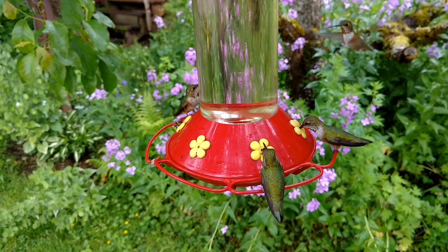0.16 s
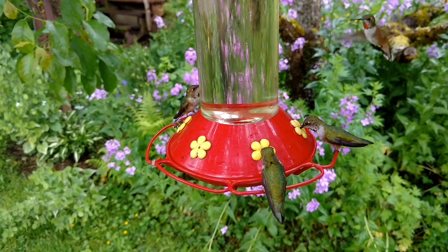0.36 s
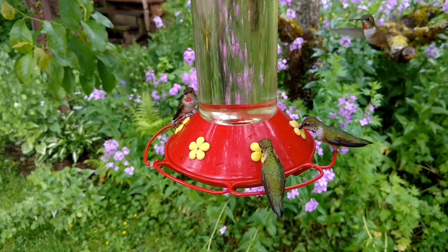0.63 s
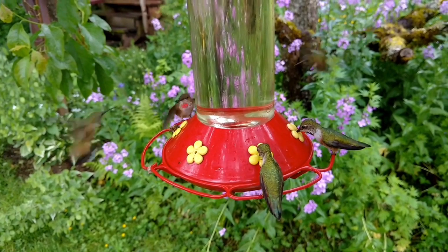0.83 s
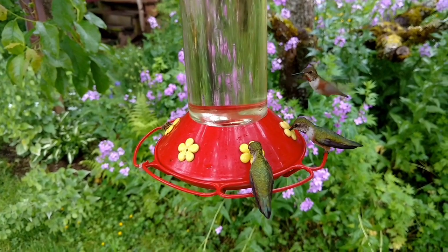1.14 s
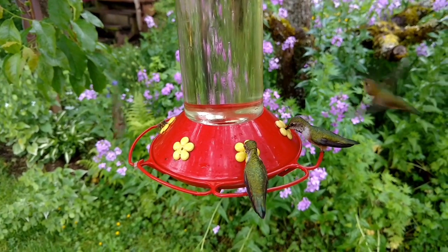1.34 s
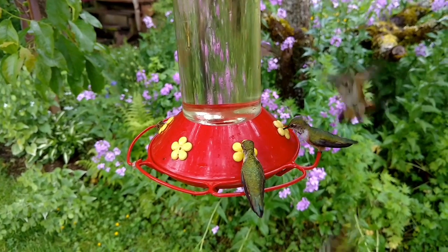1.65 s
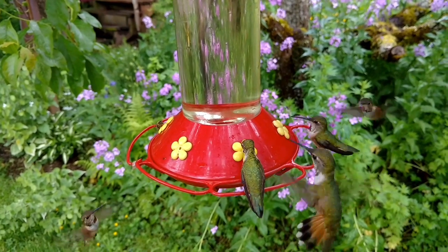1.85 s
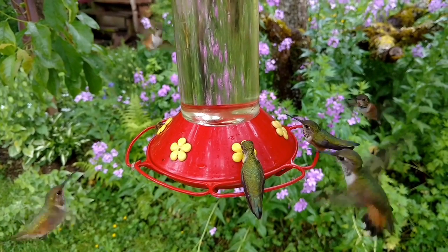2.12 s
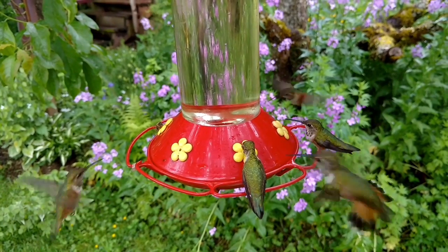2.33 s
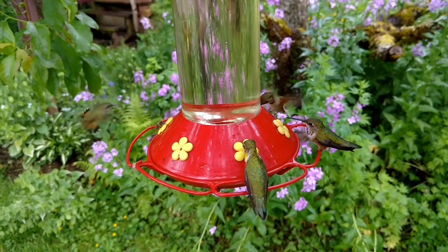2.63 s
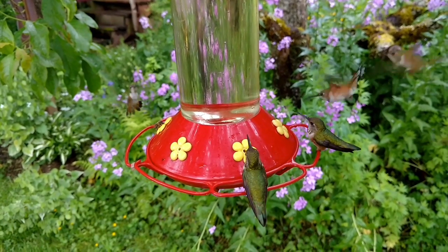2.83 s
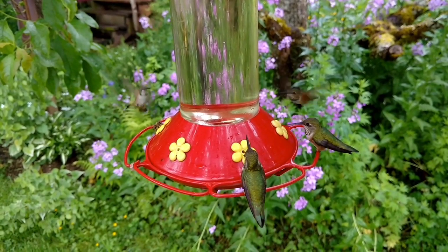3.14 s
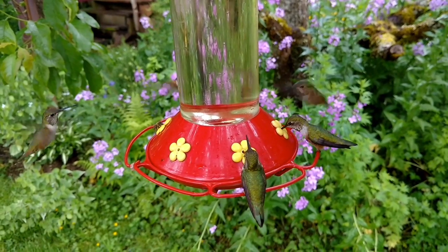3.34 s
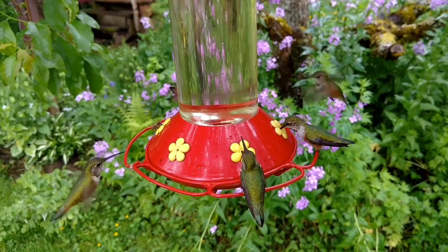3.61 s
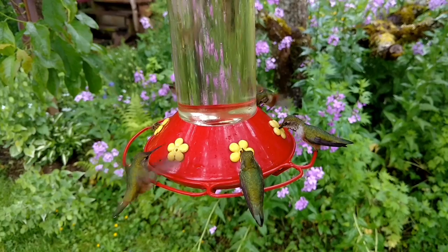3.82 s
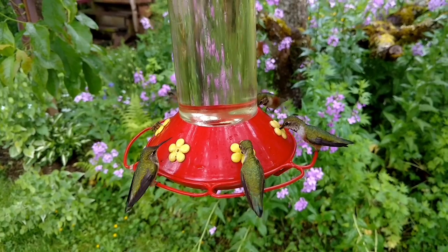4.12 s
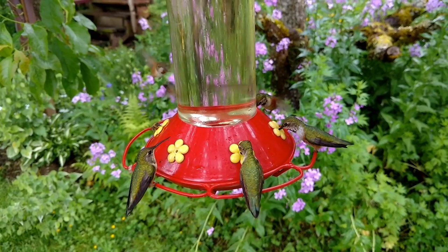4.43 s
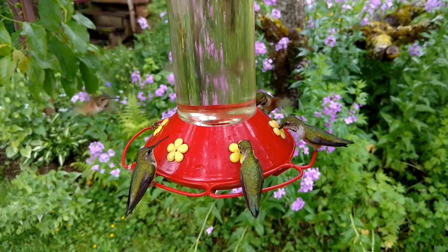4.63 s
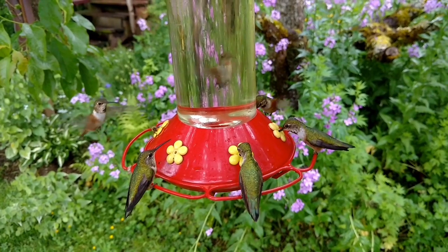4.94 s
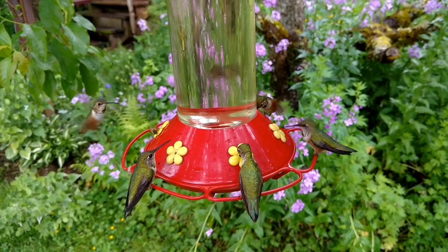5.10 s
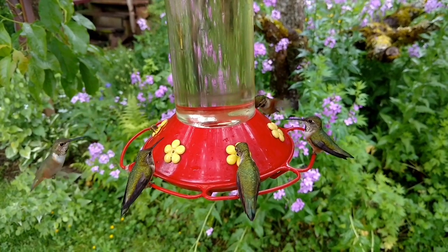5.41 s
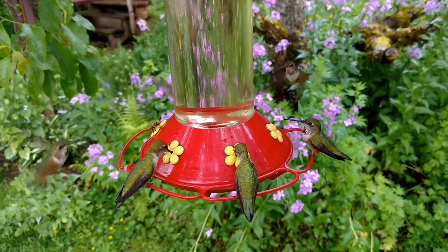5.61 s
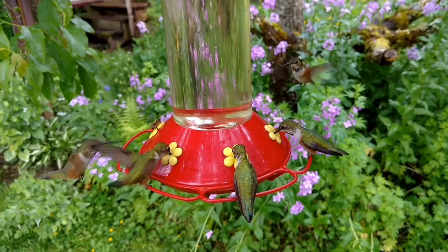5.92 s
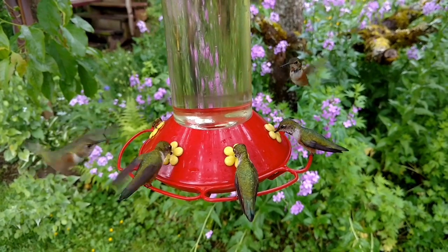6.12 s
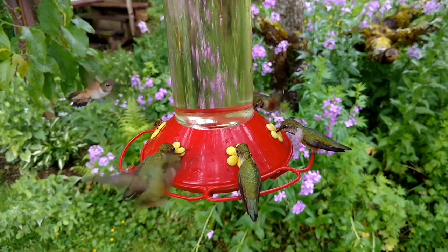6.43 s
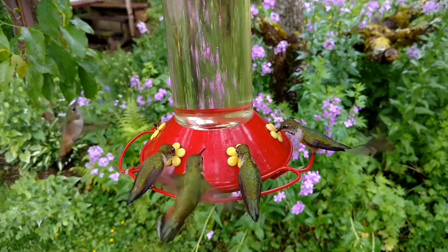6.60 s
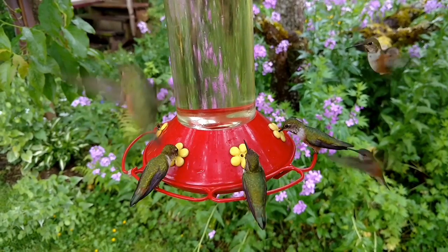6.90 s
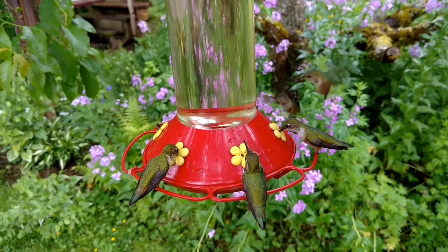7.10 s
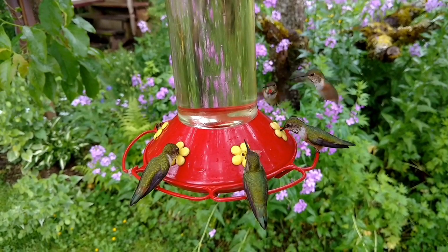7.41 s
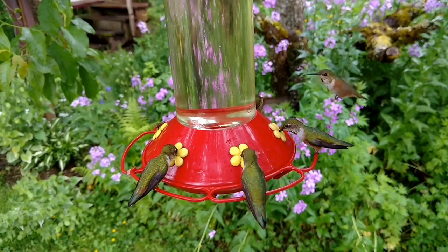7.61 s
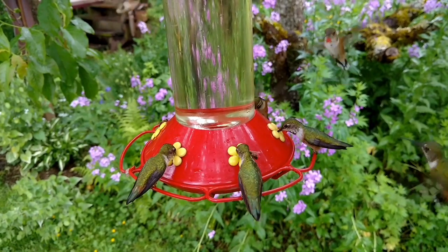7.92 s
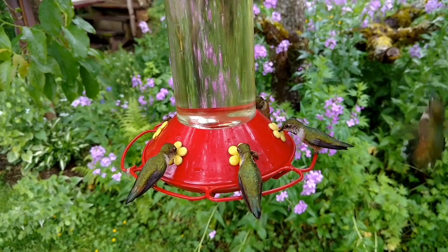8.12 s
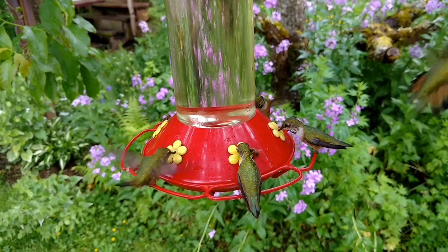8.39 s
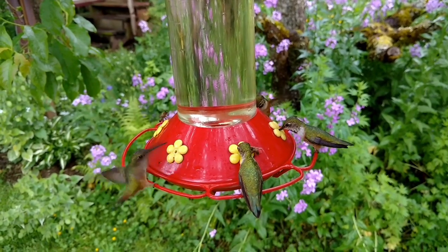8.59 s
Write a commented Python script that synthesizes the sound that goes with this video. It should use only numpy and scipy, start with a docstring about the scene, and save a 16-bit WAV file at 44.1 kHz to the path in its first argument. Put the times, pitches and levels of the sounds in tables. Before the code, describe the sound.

Hummingbirds hover and dart around a feeder with low fluttering wing hum, sharp high chips, squeals and buzzes, then a rapid squeaky chase.

```python
"""Several hummingbirds hover and squabble round a nectar feeder, close to a phone in a quiet garden.
All through, each wing stroke is a soft pressure pulse with a swish of feathers, and birds dart up close.
Whistling voices chip, growl, squeal and buzz among far songbirds, rasps of noise, snaps and one knock.
From about seven seconds a chase begins: a wobbling trill, then falling chirps with more squeals and buzzes.
The phone's two ports spread the treble wide."""
import sys
import numpy as np
from scipy import signal
from scipy.fft import rfft, irfft
from scipy.io import wavfile
from scipy.ndimage import uniform_filter1d

SR = 44100
rng = np.random.default_rng(int(sys.argv[2]) if len(sys.argv) > 2 else 0)


def to_wav(sig):
    """Store sig (one row per channel, or 1-D mono) as 16-bit WAV at the path in sys.argv[1].

    Samples outside -1..1 are clipped; the rate is SR.
    """
    pcm = np.clip(np.atleast_2d(sig), -1, 1) * 32767
    pcm = np.round(pcm).astype(np.int16)
    wavfile.write(sys.argv[1], SR, pcm.T)  # frames by channels


N = 385875


def undb(db):
    """Decibels to gain."""
    return 10 ** (np.asarray(db) / 20)


def unit(x):
    """Scale to an rms of 1."""
    return x / np.sqrt(np.mean(x ** 2))


def spectrum_at(points, hz):
    """Read (Hz, dB) points on a log-frequency axis."""
    f, db = np.transpose(points)
    return np.interp(np.log(np.maximum(hz, 1)), np.log(f), db)


def colour(x, points):
    """Causal filter with the given spectrum, built from its cepstrum."""
    size = 2 * N
    cepstrum = irfft(np.log(undb(spectrum_at(points, np.fft.rfftfreq(size, 1 / SR)))))
    cepstrum[1:N] *= 2
    cepstrum[N + 1:] = 0
    return irfft(rfft(x, size) * np.exp(rfft(cepstrum)))[..., :N]


def walk(rate, size=N):
    """Smooth random drift with a spread near 1."""
    k = max(int(SR / rate), 1)
    steps = np.repeat(rng.standard_normal(size // k + 2), k)
    return unit(uniform_filter1d(uniform_filter1d(steps, k), k))[:size]


def clock(length):
    """Sample times of a short sound."""
    return np.arange(int(length * SR)) / SR


def fade(t, rise, fall):
    """Smooth opening and closing of a short sound."""
    return np.sin(np.pi / 2 * np.clip(np.minimum(t / rise, (t[-1] - t) / fall), 0, 1)) ** 2


def add(track, start, sound):
    """Mix a short sound into a track."""
    i = max(int(start * SR), 0)
    track[i:i + len(sound)] += sound[:N - i]


def play(table, source):
    """One sound for each row of a table, at the row's time."""
    track = np.zeros(N)
    for start, *row in table:
        add(track, start, source(*row))
    return track


def place(x, pan_db):
    """Share a sound between left and right."""
    return x * undb(pan_db * np.array([[.5], [-.5]]))


def wings(beat_hz, upstroke, jitter, scatter_db, swish_width):
    """One bird: a pressure pulse on each down- and upstroke, and a swish that follows the strokes."""
    turns = rng.random() + np.cumsum(beat_hz * (1 + jitter * walk(30))) / SR
    # steering shifts the timing (in wingbeats) and the force of the upstroke
    lag = .47 + .03 * walk(14)
    steer = undb(2.5 * walk(9))
    pulses, gate = np.zeros(N), np.zeros(N)
    for offset, strength in ((0, 1), (lag, upstroke * steer)):
        phase = (turns - offset) % 1 - .5
        force = strength * undb(scatter_db * walk(40))
        pulses -= force * np.exp(-(phase / 0.01) ** 2)
        gate += force * np.exp(-(phase / swish_width) ** 2)
    swish = unit(gate + 0.67) * rng.standard_normal(N)
    return unit(pulses - pulses.mean()), swish


def darting():
    """Each dart is a straight pass, loudest where it is closest; the loudest mostly sets beat and side."""
    # A bird darts up close and away again.
    # Each row: time when closest in seconds, half-width in seconds, relative hum level in dB,
    # relative feather swish level in dB, wingbeat when closest in Hz, left minus right in dB.
    dart_rows = [ (.03, 0.069, -42, -39.5, 52.9, 6), (.71, 0.042, -38.5, -50.5, 63.06, 0),
                 (.89, 0.13, -39, -46, 53.8, 2), (1.481, 0.1, -36.5, -42.5, 58.2, -4),
                 (1.67, 0.057, -41, -50, 53.3, 5), (1.85, 0.054, -37.5, -41, 58.44, 1),
                 (2.14, 0.047, -40, -41, 50.04, -2), (2.257, 0.052, -35, -40, 58.33, 1),
                 (2.38, 0.047, -39, -43, 60.26, 0), (2.75, 0.087, -46, -52, 57.84, -5),
                 (3.07, 0.13, -41, -42.5, 59.7, 3), (3.255, .02, -33, -41, 65.46, 2),
                 (3.431, 0.063, -42, -43.5, 62.1, 3), (3.549, 0.055, -36.5, -45.5, 73.2, -1),
                 (3.73, 0.044, -44, -51, 63.1, -2), (4.33, 0.076, -46, -50, 62.5, 2),
                 (4.51, 0.037, -44, -47, 67.4, 6), (5.07, 0.066, -45, -50.5, 53.26, 3),
                 (5.39, 0.032, -44.5, -45.5, 57.57, 0), (5.48, 0.032, -41.5, -50, 58, 0),
                 (5.679, 0.038, -38.5, -44.5, 61.2, 1), (5.81, 0.042, -43, -45, 54.97, -1),
                 (5.958, 0.041, -40, -51, 65.54, 0), (6.19, 0.064, -39, -47, 58.97, 1),
                 (6.36, 0.05, -39.5, -53, 58.7, 1), (6.49, 0.053, -37.5, -45, 58, -4),
                 (6.58, 0.02003, -32, -41.5, 67, -3), (6.655, .05, -33, -45, 62.67, 3),
                 (6.735, 0.049, -35.5, -41.5, 61.95, 3), (6.9, 0.1, -43, -61, 55.8, 3),
                 (7.46, 0.075, -53, -71, 56.63, 7), (7.63, 0.034, -43, -49, 54.9, -2),
                 (7.74, 0.063, -45, -64, 55.46, -7), (7.931, 0.057, -44, -53.5, 54.36, -5),
                 (8.29, 0.063, -51, -56, 48.07, -8), (8.66, 0.095, -44, -50.5, 61.8, 0)]
    s, width, hum_db, swish_db, beat_hz, pan_db = np.transpose(dart_rows)
    sag = .035  # beats faster on the way in than on the way out, by up to this share each way
    falloff = 2.6  # the wing sound weakens as this power of the distance
    t = np.linspace(0, N / SR, 4000)
    along = (t[:, None] - s) / width
    distance = np.hypot(1, along)
    beat_hz = beat_hz * (1 - sag * along / distance)
    hum, swish = (undb(db) * distance ** -falloff for db in (hum_db, swish_db))
    share = hum ** 4 / np.sum(hum ** 4, axis=1, keepdims=True)
    hum_level, swish_level = np.linalg.norm(hum, axis=1), np.linalg.norm(swish, axis=1)
    controls = hum_level, swish_level, np.sum(share * beat_hz, axis=1), share @ pan_db
    return [np.interp(np.arange(N) / SR, t, control) for control in controls]


def hovering():
    """Birds further back: hum level, swish level and side glide from row to row."""
    # Each row: time in seconds, relative hum level in dB, relative feather swish level in dB,
    # left minus right of the hum in dB.
    hover_rows = [(0, -46.5, -52, -1), (.33, -50.5, -47, 14), (.6, -47, -44, 8), (1.2, -48, -50, -1),
                  (1.6, -41.5, -39.5, 10), (2, -45, -47, -8), (2.45, -46, -45.5, -1),
                  (2.85, -47.5, -47.5, -9), (3.35, -45, -45, -1), (4.05, -50, -48.5, -1),
                  (4.75, -48.5, -45.5, 0), (5.25, -51, -50, 2.5), (6, -46, -46.5, 3), (6.65, -36.5, -36, 2),
                  (7.18, -62, -58, 1), (7.85, -51, -54, -7), (8.12, -58.5, -58.5, -14.5),
                  (8.75, -48.5, -50, -14)]
    s, *columns = np.transpose(hover_rows)
    hum_db, swish_db, pan_db = (np.interp(np.arange(N) / SR, s, column) for column in columns)
    return undb(hum_db), undb(swish_db), pan_db


def off_axis(hum):
    """Low hum is added with opposite signs to the two sides, which widens it."""
    side = signal.sosfilt(signal.butter(1, 90, fs=SR, output="sos"), hum)
    return (undb(2.5) * side - 0.082 * hum) * np.array([[1], [-1]])


def downwash(lead, crowd):
    """Air stirred by the wings buffets each port on its own, mostly in the bass."""
    near_db, crowd_db = -10, -3  # stirred air, relative to the hum controls
    air_colour = [(25, -33), (42, -32), (60, -16), (82, -17.5), (112, -2.5), (230, -1.5),
                  (400, -10), (800, -21.0), (3000, -62)]  # (Hz, dB)
    eddies = colour(rng.standard_normal((2, N)), air_colour)
    return unit(eddies) * np.hypot(undb(near_db) * lead, undb(crowd_db) * crowd)


def flock():
    """One near wing darts about and two beat behind it at changing rates; gives stereo hum, mono swish."""
    # The sound of one wing stroke. Each row: frequency in Hz, level in dB.
    stroke_colour = [(30, -60), (50, -25), (62, -8.5), (82, -5.5), (108, 0), (170, 6), (235, 3),
                     (330, -3.5), (530, -0.5), (700, -19), (1200, -17.5), (3000, -39.5)]
    # Air through the feathers. Each row: frequency in Hz, level in dB.
    feather_colour = [(100, -15.5), (400, 6.5), (900, -0.5), (1800, -1), (3200, 2.5), (4000, 4), (5200, 3),
                      (7000, -2.5), (8500, -8), (10000, -16.5), (14500, -11.5), (16000, -40)]
    lead, lead_swish, lead_hz, lead_pan_db = darting()
    crowd, crowd_swish, crowd_pan_db = hovering()

    near, swish = wings(lead_hz, upstroke=.28, jitter=.014, scatter_db=2, swish_width=.11)
    near = lead * unit(colour(near, stroke_colour))
    swish = lead_swish * swish

    behind = 0
    for beat_hz in (54, 61):
        changing_hz = beat_hz * (1 + .04 * walk(3))
        pulses, air = wings(changing_hz, upstroke=.38, jitter=.014, scatter_db=2, swish_width=.13)
        share = undb(4.0 * walk(3.903))  # each bird's level wavers
        behind = behind + share * pulses
        swish = swish + crowd_swish * unit(share) * air / np.sqrt(2)
    behind = crowd * unit(colour(behind, stroke_colour))

    hum = place(near, lead_pan_db) + place(behind, crowd_pan_db) + off_axis(near + behind)
    swish = unit(colour(swish, feather_colour)) * np.std(swish) * undb(3.5)
    return undb(-0.56) * hum + downwash(lead, crowd), swish


def garden_air():
    """Quiet background noise, shaped by a spectrum, with a slowly drifting level."""
    # Each row: frequency in Hz, level in dB.
    garden_colour = [(20, -12), (70, 14), (130, 21), (500, 16), (900, 1.5), (2000, 9.5), (3500, -8),
                     (6000, -48.5), (10000, 6.5), (16000, 9)]
    return unit(colour(rng.standard_normal(N), garden_colour)) * undb(-60.0 + walk(1.83))


def syrinx(hz, overtone_db, rough):
    """A whistle with overtones shaped by the throat; roughness shakes pitch and strength and adds hiss."""
    # How strongly throat and bill pass each partial. Each row: frequency in Hz, level in dB.
    throat = [(1800, -4), (2600, -3), (3400, -0.5), (5000, -1), (6500, 1.5), (9200, -4), (10200, -17),
              (11500, -10.5), (13000, -19.5), (16000, -30)]
    hiss_db = -7  # turbulent air in a fully rough voice
    hz = hz * (1 + 0.153 * rough * walk(2500, size=len(hz)))
    phase = 2 * np.pi * np.cumsum(hz) / SR
    tone = 0
    for k in range(1, 5):
        strength = undb(spectrum_at(throat, k * hz) + overtone_db * np.log2(k))
        tone = tone + strength * (k * hz < SR / 2) * np.sin(k * phase)
    band = signal.butter(2, [3500, 9000], "bandpass", fs=SR, output="sos")
    hiss = signal.sosfilt(band, rng.standard_normal(len(hz)))
    shake = undb(1.1 * rough * walk(900, size=len(hz)))
    return tone * shake + undb(hiss_db) * rough * unit(hiss)


def songbird(length, start_hz, end_hz, arch_hz, db, warble_hz):
    """A soft, curved glide of wavering strength; the deeper the warble, the hoarser it sounds."""
    t = clock(length)
    u = t / length
    warble = .5 * walk(160, size=len(t)) + 1.3 * walk(1100, size=len(t))
    hz = start_hz + (end_hz - start_hz) * u + arch_hz * np.sin(np.pi * u) + warble_hz * warble
    waver_db = 3.5 * walk(70, size=len(t)) - 1.5
    return undb(db + waver_db) * fade(t, 0.0088, 0.01) * np.sin(2 * np.pi * np.cumsum(hz) / SR)


def far_birds():
    """Far birds sing short gliding notes."""
    # Each row: start in seconds, length in seconds, start pitch in Hz, end pitch in Hz,
    # arch of the pitch in Hz, relative level in dB, warble depth (relative, in Hz).
    songbird_rows = [ (.09, 0.075, 3600, 3140, 0, -50, 70), (.19, .16, 7650, 7360, 200, -54, 120),
                     (.337, 0.061, 4120, 4105, 20, -37, 25), (.39, 0.13, 4150, 4090, 0, -52, 25),
                     (.84, .22, 4635, 4710, 61, -49, 35), (1.06, 0.224, 4360, 4334, -50.5, -50, 55),
                     (1.46, .17, 4190, 4190, 0, -47.5, 35), (1.68, .15, 4163, 3270, 0, -49, 99),
                     (1.96, .13, 4230, 4350, 0, -52.5, 50), (3.61, .24, 4650, 4650, 111, -54, 80),
                     (3.69, 0.052, 3420, 3220, -70, -52, 15.3), (3.86, .04, 3630, 3570, 7, -56, 15),
                     (3.995, 0.036, 4120, 4020, 0, -59, 15), (4.06, .06, 4000, 4080, 170, -52, 15),
                     (4.113, 0.056, 3940, 3300, -90, -51, 20)]
    return play(songbird_rows, songbird)


def chip(lead, lead_db, knee_hz, glide, db, overtone_db):
    """Any thin high lead-in sags to a knee; the note dives within milliseconds and stops short."""
    peak_glides, spread_glides, tail_db = 0.92, 1, -19  # pressure peak of the dive, and what stays under it
    t = clock(lead + 2.5 * glide)
    u = np.maximum(t - lead, 0) / glide
    dive_hz = (knee_hz - 1800) * np.exp(-(u / 1.06) ** 1.2)
    hz = 1800 + dive_hz + 1500 * np.tanh(np.maximum(lead - t, 0) / .004)
    dive = np.exp(-(((t - lead) / glide - peak_glides) / spread_glides) ** 2)
    pressure = dive + undb(lead_db) * np.exp(-(2 * u) ** 2) + undb(tail_db)
    return undb(db) * pressure * fade(t, .0015, .002) * syrinx(hz, overtone_db, rough=.05 + .09 * u)


def faint_chips():
    """The birds further back tick softly at random moments, following the level of their swish."""
    chips_per_s, level_db, spread_db = 3, 6, 2  # the levels are relative to the crowd's swish control
    _, swish, _ = hovering()
    when, pitch, force = rng.random((int(chips_per_s * N / SR), 3)).T
    rows = np.transpose([when * N / SR, 5000 + 2500 * pitch, level_db + spread_db * (2 * force - 1)])
    return swish * play(rows, lambda knee_hz, db: chip(0, 0, knee_hz, glide=.005, db=db, overtone_db=-6))


def near_chips():
    """Dry single chips: quick dives of the voice."""
    # Each row: start in seconds, lead-in in seconds, lead-in level in dB relative to the dive,
    # knee pitch in Hz, glide time in seconds, relative level in dB, overtone level in dB per octave.
    chip_rows = [ (.171, 0, -30, 3900, 0.0066, -28, -8), (.653, 0, -30, 4900, 0.0058, -22, -9),
                 (.965, 0.0031, -3, 7520, .0056, -28.5, -8), (1.181, 0, -30, 7500, 0.0053, -26, -4),
                 (2.044, 0.00057, -30, 7380, 0.0074, -36.5, -6),
                 (2.089, 0.00066, -30, 7530, .0055, -24.5, -8), (2.155, .0075, -19, 7480, 0.006, -20, -13),
                 (3.218, .0035, -21, 7400, .0068, -19, -10), (3.452, 0.0057, -5, 7604, 0.0066, -21, -6.5),
                 (4.186, 0.0064, -22, 7400, 0.007, -22.5, -11), (4.998, 0, -30, 4780, .005, -25.5, -14),
                 (5.103, .006, 0, 7470, .0066, -20, -6), (5.310, 0, -30, 4980, .0075, -36.5, -7),
                 (5.527, 0, -30, 6010, 0.0057, -38, -3), (5.715, .0075, -18, 7304, 0.0049, -18, -8),
                 (6.031, 0.0022, -30, 6913, 0.0057, -27.5, -0.5),
                 (6.270, 0.00075, -6, 7387, .0062, -18, -9)]
    return play(chip_rows, chip)


def rasp(rise, decay, db):
    """A burst of fluttering hiss."""
    t = clock(rise + 4 * decay)
    shape = np.minimum(t / rise, 1) * np.exp(-np.maximum(t - rise, 0) / decay)
    flutter_db = 1.5 * walk(700, size=len(t))
    return undb(db + 1.5 + flutter_db) * shape * rng.standard_normal(len(t))


def dry_rasps():
    """Dry rasps of scuffling birds: noise bursts with a shared colour."""
    # Each row: start in seconds, rise in seconds, decay in seconds, relative level in dB.
    rasp_rows = [ (.595, 0.0096, 0.036, -36), (.783, 0.0051, 0.045, -36), (1.524, 0.0022, 0.019, -29.5),
                 (2.388, 0.039, 0.04, -33.5), (3.080, 0.0054, 0.013, -33), (3.170, 0.0083, 0.028, -39),
                 (3.712, 0.0052, 0.024, -36), (3.905, 0.0037, 0.017, -43), (4.355, 0.0029, 0.014, -41.5),
                 (4.388, 0.0025, 0.01, -37), (4.928, 0.0093, .018, -44), (6.373, 0.005, 0.061, -35.5),
                 (6.790, 0.0076, 0.03, -25), (8.635, 0.025, 0.043, -35)]
    # Each row: frequency in Hz, level in dB.
    rasp_colour = [(500, -40), (2000, -19), (3200, 9.5), (6200, 10.5), (8500, -0.5), (11000, -11),
                   (16000, -23)]
    return colour(play(rasp_rows, rasp), rasp_colour)


def snap(db):
    """A very short crack: a noise click whose spectrum is evened out."""
    t = clock(.008)
    burst = rfft(np.exp(-t / .0004) * rng.standard_normal(len(t)))
    return undb(db) * irfft(burst / np.abs(burst)) * np.exp(-(t / .003) ** 2)


def sharp_snaps():
    """Sharp snaps of wings and bills: cracks with a shared colour."""
    # Each row: start in seconds, relative strength in dB.
    snap_rows = [(.759, -16.5), (1.417, -16), (2.384, -4), (2.911, -21.5), (3.226, -19), (3.257, -14),
                 (3.372, -24), (4.370, -18.5), (5.841, -17.5), (5.883, -19), (6.773, -9), (6.791, -14),
                 (6.799, -24), (8.568, -21.5), (8.584, -25), (8.617, -20.5)]
    # Each row: frequency in Hz, level in dB.
    snap_colour = [(60, -26), (300, -2), (900, 9.5), (2000, 10), (6000, 12), (10000, -1.5), (16000, -2)]
    return colour(play(snap_rows, snap), snap_colour)


def growl(length, start_hz, end_hz, db, overtone_db, swell_db):
    """The lowest register of the voice: a hoarse, fluttering, sinking tone and its octave."""
    t = clock(length)
    shake = .035 * walk(260, size=len(t)) + .075 * walk(1300, size=len(t))
    hz = np.linspace(start_hz, end_hz, len(t)) * (1 + shake)
    phase = 2 * np.pi * np.cumsum(hz) / SR
    force = undb(db + swell_db * t / length + 3 * walk(300, size=len(t))) * fade(t, .005, .008)
    return force * (np.sin(phase) + undb(overtone_db) * np.sin(2 * phase))


def low_growls():
    """Low hoarse growls: two shaken tones an octave apart."""
    # Each row: start in seconds, length in seconds, start pitch in Hz, end pitch in Hz,
    # relative level in dB, overtone level in dB, swell from start to end in dB.
    growl_rows = [(.80, .18, 1930, 1880, -42.5, -12, 3.5), (1.528, .062, 2160, 1753, -35, 9, -7),
                  (1.675, .068, 1940, 1873, -42, -6, 3)]
    return play(growl_rows, growl)


def squeal(hold, start_hz, top_hz, collapse, release, db, overtone_db, rough):
    """A held, curved note that bends over and collapses in pitch as the pressure goes."""
    t = clock(hold + .017)
    arch = top_hz + (start_hz - top_hz) * (2 * np.minimum(t / (hold + .006), 1) - 1) ** 2
    drop = np.maximum(t - hold, 0)
    hz = arch * np.exp(-(drop / collapse) ** 2)
    hoarse = rough + .35 * np.minimum(drop / .013, 1) ** 2
    return undb(db) * fade(t, 0.0049, 0.0046) * np.exp(-drop / release) * syrinx(hz, overtone_db, hoarse)


def curved_squeals():
    """Curved squeals that end in a drop of pitch and pressure."""
    # Each row: start in seconds, hold in seconds, start pitch in Hz, mid-arch pitch in Hz,
    # collapse time in seconds, release in seconds, relative level in dB,
    # overtone level in dB per octave, starting roughness from 0 to 1.
    squeal_rows = [ (1.099, 0.027, 6900, 7090, .026, 0.011, -16, 1.5, 0.04),
                   (1.268, .002, 8450, 8450, .0155, 0.029, -22, 2, .06),
                   (1.360, .014, 6500, 6206, .016, 0.0058, -16, 3, 0.1),
                   (1.511, 0.0021, 8450, 8450, 0.014, .05, -18.5, -1, 0.14),
                   (1.658, .02, 5750, 6620, 0.014, 0.0052, -16.5, 2, 0.06),
                   (1.810, 0.01, 7950, 8060, 0.017, 0.028, -18.5, 2.5, 0.17),
                   (7.653, .030, 5200, 6170, .012, 0.007, -21, -1.5, .09),
                   (7.978, .018, 5400, 5707, .012, 0.0085, -19.5, 1.5, .15),
                   (8.288, 0.018, 5500, 5810, .013, 0.0099, -19.5, -1.5, .16)]
    return play(squeal_rows, squeal)


def sweep(top_hz, bottom_hz, rough, length, fall_s):
    """One stroke of a buzz: it starts hard on a high note and dives, losing pressure as it falls."""
    t = clock(length)
    hz = top_hz * (bottom_hz / top_hz) ** ((t / fall_s) ** 1.4)
    pressure = (hz / top_hz) ** .95 * fade(t, .0008, .002)
    return pressure * syrinx(hz, overtone_db=1.0, rough=rough + 0.23 * t / fall_s)


def buzz(length, top_hz, bottom_hz, db, rough):
    """About 110 downsweeps a second, sinking and growing hoarser; clean runs weaken fast, rough ones hold."""
    period, gap, fall_s = .009, .001, .0068  # seconds; the bottom pitch is reached after fall_s
    # from one sweep to the next, for a clean voice: share of pitch lost and level; then roughness gained
    sag, fade_db, hoarser = 0.0383, -3, 0.064
    run = np.zeros(N)
    # small random shifts of time, pitch and force
    for k, (late, pitch, force) in enumerate(rng.standard_normal((round(length / period), 3))):
        sweep_db = db + k * fade_db * (1 - 1.5 * rough) + force
        sweep_hz = top_hz * (1 - k * sag * (1 - rough) + .02 * pitch)
        stroke = sweep(sweep_hz, bottom_hz, rough + k * hoarser, period - gap, fall_s)
        add(run, (k + .04 * late) * period, undb(sweep_db) * stroke)
    return run


def quick_buzzes():
    """Buzzes: runs of quick downsweeps of the voice."""
    # Each row: start in seconds, length in seconds, first sweep top in Hz, sweep bottom in Hz,
    # relative level of the first sweep in dB, starting roughness from 0 to 1.
    buzz_rows = [ (1.193, .027, 7460, 5800, -23.5, 0.52), (1.425, 0.037, 7280, 6130, -19, 0.45),
                 (1.733, 0.032, 7500, 6300, -17.5, 0.39), (7.4235, 0.038, 7670, 2715, -11.5, 0),
                 (7.7415, .04, 7110, 2670, -17.5, .25), (8.0545, .036, 6910, 2626, -16, 0.17),
                 (8.3695, 0.041, 7360, 2630, -13.5, 0.17)]
    return play(buzz_rows, buzz)


def knock(hz, decay, db):
    """A hollow pop that dies within a cycle or two and has little bass."""
    t = clock(8 * decay)
    ring = np.exp(-t / decay) * np.sin(2 * np.pi * hz * t)
    # the slope of the ring holds less bass than the ring itself
    return undb(db) * np.diff(ring, prepend=0) * SR / (2 * np.pi * hz)


def hollow_knock():
    """A hollow knock in a scuffle: a tone that dies almost at once."""
    # Each row: start in seconds, pitch in Hz, decay in seconds, relative level in dB.
    knock_rows = [(2.3837, 1050, .00036, -9.5)]
    return play(knock_rows, knock)


def trill(length, centre_hz, swing_hz, rate_hz, db):
    """A nearly pure whistle wobbles fast and wide, strongest at each turn; it narrows, then slides down."""
    throb, start_accent = 0.33, 0.25  # extra pressure at the turns of the wobble and at the start, as shares
    t = clock(length + .024)
    wobble = -np.cos(2 * np.pi * rate_hz * (np.minimum(t, length - .003) - .0008))
    drop = np.maximum(t - length, 0)
    swing = swing_hz * (1.08 - .2 * t / length) * (wobble - .26 * wobble ** 2)
    hz = (centre_hz + swing + 40 * walk(120, size=len(t))) * np.exp(-(drop / .021) ** 1.2)
    accent = 1 + start_accent * np.exp(-t / .03)
    turns = (1 + throb * (wobble ** 2 - .5)) * (1 + .12 * wobble)
    pressure = accent * np.exp(-t / 1.2 - drop / 0.017) * turns
    voice = syrinx(hz, overtone_db=-6, rough=.012 + 12 * drop)
    return undb(db + .5) * pressure * fade(t, .001, .004) * voice


def chase_trill():
    """The chase trill: a fast, wide wobble of the voice."""
    # Each row: start in seconds, length in seconds, centre pitch in Hz, relative pitch swing in Hz,
    # wobbles per second, relative level in dB.
    trill_rows = [(7.057, .160, 8420, 1350, 99.6, -14.5)]
    return play(trill_rows, trill)


def chirp(start_hz, glide, length, db, overtone_db, rough, peak, tail_db):
    """The pitch drops fast, then sinks slowly with a hoarser voice; long chirps trail off thin and reedy."""
    spread_glides = 1.32  # how broadly the air pressure peaks
    flutter_db = 3.5  # how much the tail breaks up
    # the voice catches as the chirp slips into its low register: how deeply and when
    break_db, break_glides = 7, 3.3
    t = clock(length)
    u = t / glide
    hz = 1880 + (start_hz - 1880) * (.85 * np.exp(-1.15 * u) + .15 * np.exp(-u / 3.5))
    tail = undb(tail_db + flutter_db * walk(259, size=len(t)))
    pressure = np.exp(-((u - peak) / spread_glides) ** 2) + tail
    hoarse = rough * np.interp(u, [0, 1.6, 3, 4.5], [.4, 1, 1.2, .6])
    hz = hz * (1 + .06 * hoarse * walk(700, size=len(t)))
    pressure = pressure * undb(-break_db * np.exp(-((u - break_glides) / .6) ** 2))
    return undb(db) * pressure * fade(t, 0.0018, 0.0019) * syrinx(hz, overtone_db, hoarse)


def falling_chirps():
    """Falling chirps of the chase: the voice drops fast, then sinks."""
    # Each row: start in seconds, start pitch in Hz, glide time in seconds, length in seconds,
    # relative level in dB, overtone level in dB per octave, relative roughness from 0 to 1,
    # time of the pressure peak in glide times, tail level in dB.
    chirp_rows = [ (7.320, 5920, .011, .043, -27.5, 2.5, 0.08, 0.76, -16),
                  (7.396, 4165, 0.0064, 0.0056, -33, -12, 0.49, .8, -15),
                  (7.418, 4600, .002, .0048, -32, 4.5, 0.3, .8, -15),
                  (7.515, 9850, 0.014, 0.071, -17, -3.5, 0.26, 0.48, -21.5),
                  (7.733, 7250, 0.0039, 0.0063, -24, -2, 0.34, .8, -15),
                  (7.838, 9270, .011, 0.09, -22.5, -3, 0.35, 0.81, -14.5),
                  (8.038, 9500, 0.007, 0.019, -22.5, -7, .5, 1.3, -14),
                  (8.150, 9300, .0135, .083, -22, -1, 0.3, 0.96, -16),
                  (8.363, 6485, 0.0043, 0.0063, -22, -7, 0.49, 0.82, -15),
                  (8.468, 9780, .014, 0.088, -23, 1, 0.51, 0.83, -19),
                  (8.626, 8010, .0057, .019, -22.5, -4, .4, 0.78, -15)]
    return play(chirp_rows, chirp)


def scatter(x, t60):
    """Diffuse reflections from leaves and walls, different at each port; they fall 60 dB in t60 seconds."""
    t = clock(.5)
    tail = rng.standard_normal((2, len(t))) * undb(-60 * t / t60) * (t > .003)
    tail /= np.sqrt(np.sum(tail ** 2, axis=1, keepdims=True))
    return signal.fftconvolve(x[None], tail, axes=1)[:, :N]


def scene():
    """Wings, calls and scuffles near the feeder, with the garden behind."""
    hum, swish = flock()
    air = garden_air()
    far = far_birds()
    rasps = dry_rasps()
    voices = faint_chips() + low_growls() + curved_squeals() + falling_chirps()
    closest = near_chips() + sharp_snaps() + quick_buzzes() + hollow_knock() + chase_trill()
    near = voices + rasps + closest

    # the closest sounds have weaker reflections
    echoing = voices + rasps + undb(-3) * closest
    early = scatter(undb(-9.5) * echoing + undb(-23.5) * swish, t60=.035)
    late = undb(-15) * scatter(echoing, t60=.17) + undb(-4) * scatter(far, t60=.25)
    return hum + place(near + swish + early, pan_db=-2) + undb(6.0) * far + air + late


def record(dry):
    """The port pair colours the sound and shifts phase and balance with frequency; the top is cut."""
    # Phase by which the right port leads the left. Each row: frequency in Hz, lead in half turns.
    port_phase = [(0, 0), (1550, 0), (2250, .9), (2580, 1.04), (2750, 1.18), (3600, 2), (5000, 3),
                  (6300, 4), (7650, 5), (8700, 6), (9400, 6), (10100, 5), (11200, 4), (13500, 2),
                  (16000, 1)]
    # Left minus right. Each row: frequency in Hz, difference in dB.
    port_balance = [(100, -4), (1300, 2.2), (2450, 2.3), (3700, 1.2), (5000, -1), (6000, -2.2),
                    (7000, -2.5), (7800, -.5), (9300, .3), (10100, 2), (11200, 3.5), (15000, 1.5)]
    # Colour of the microphone. Each row: frequency in Hz, level in dB.
    microphone = [(100, 0), (1700, -0.5), (2600, -0.5), (3300, 0.5), (3950, -3), (4900, 3), (6000, -1),
                  (7300, 1), (9200, 0), (10500, 2), (16000, -5)]
    top_hz = 15600
    hz = np.fft.rfftfreq(2 * N, 1 / SR)
    lead = np.pi * np.interp(hz, *np.transpose(port_phase))
    half = np.array([[.5], [-.5]])  # each port takes half of the difference
    level_db = spectrum_at(microphone, hz) + half * spectrum_at(port_balance, hz)
    ports = undb(level_db) * np.exp(-1j * half * lead)
    wide = irfft(rfft(dry, 2 * N) * ports)[:, :N]
    return signal.sosfilt(signal.ellip(8, .2, 70, top_hz, fs=SR, output="sos"), wide)


dry = scene()
out = record(dry)
to_wav(out)
```